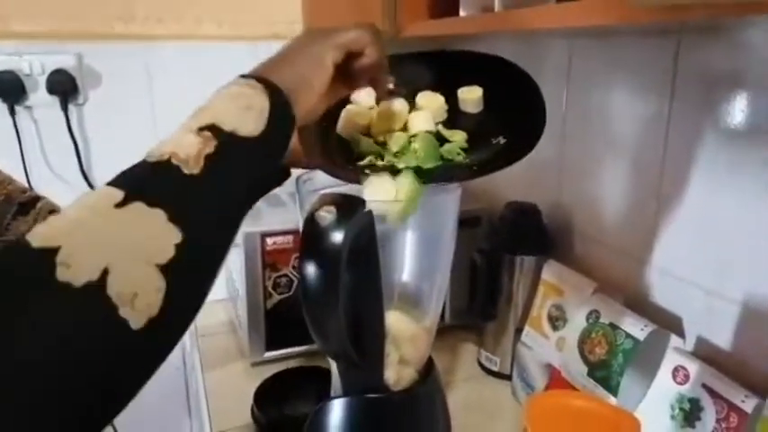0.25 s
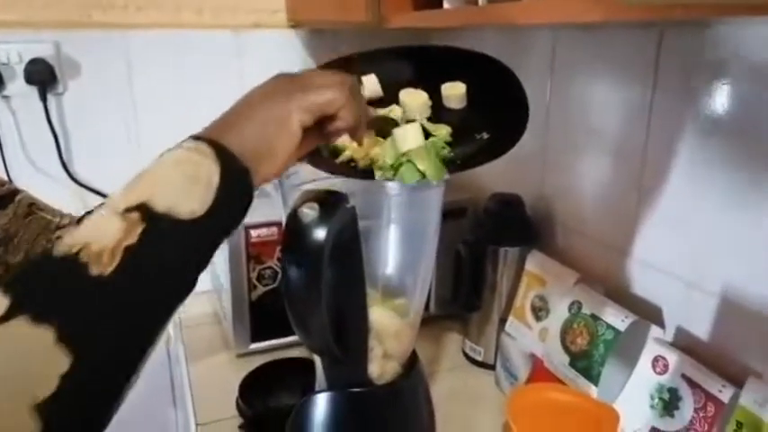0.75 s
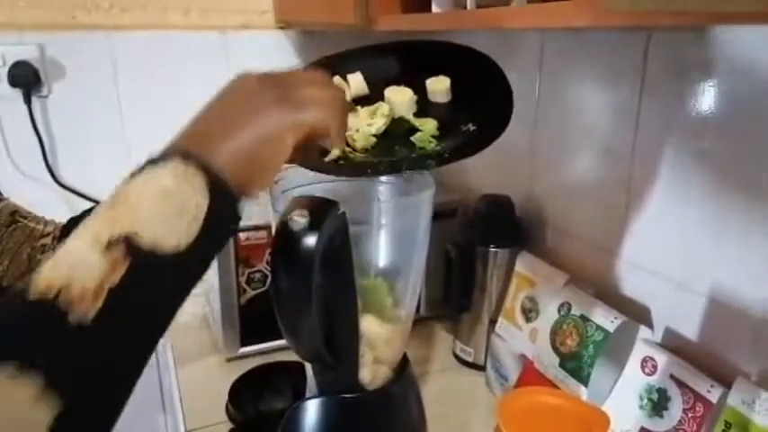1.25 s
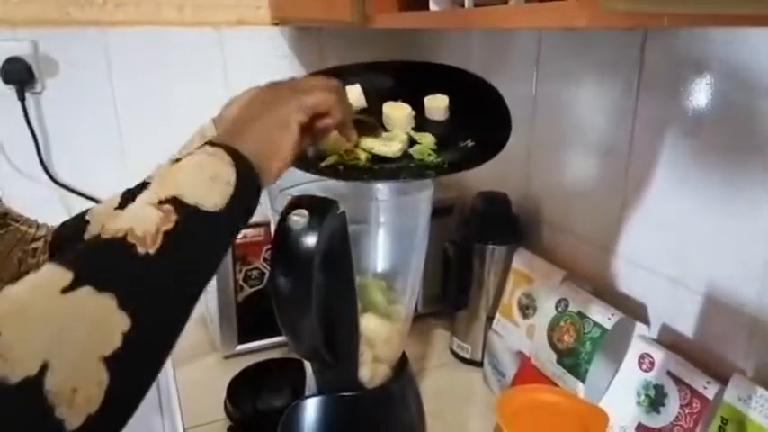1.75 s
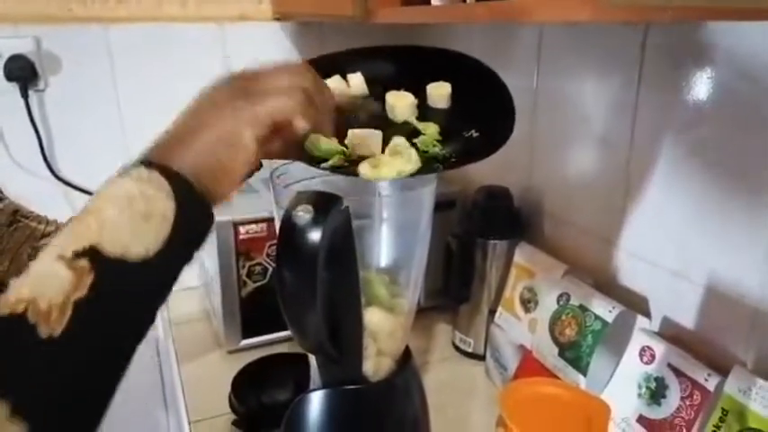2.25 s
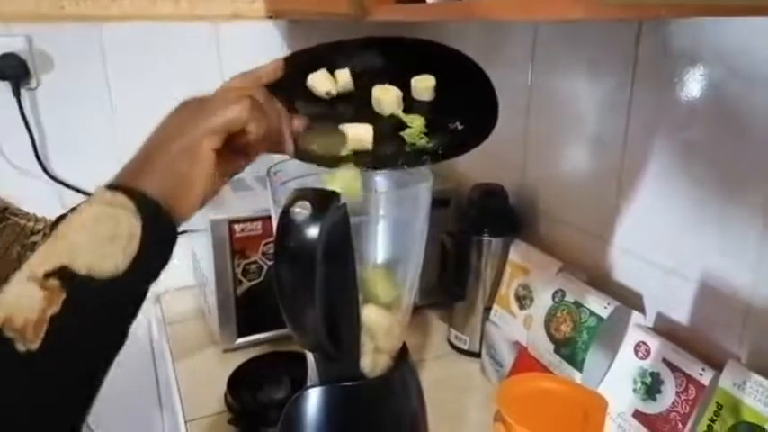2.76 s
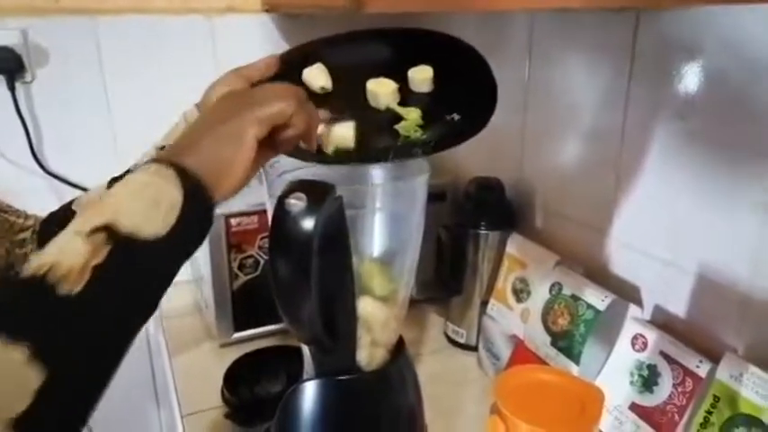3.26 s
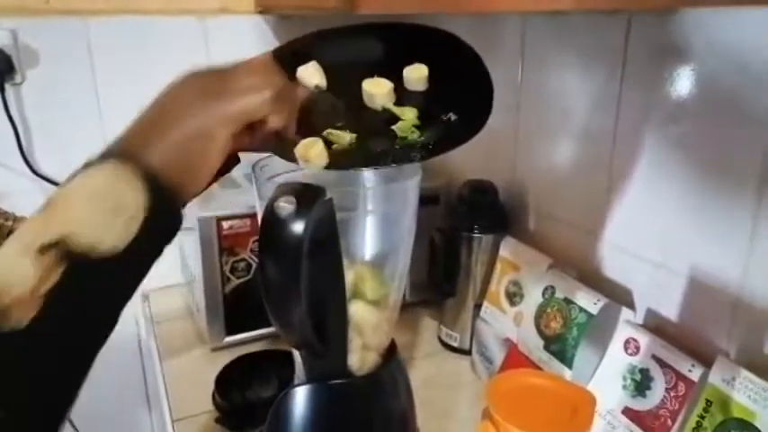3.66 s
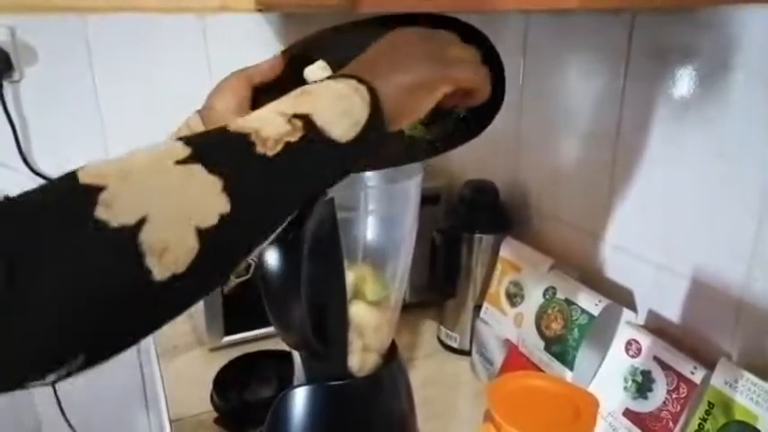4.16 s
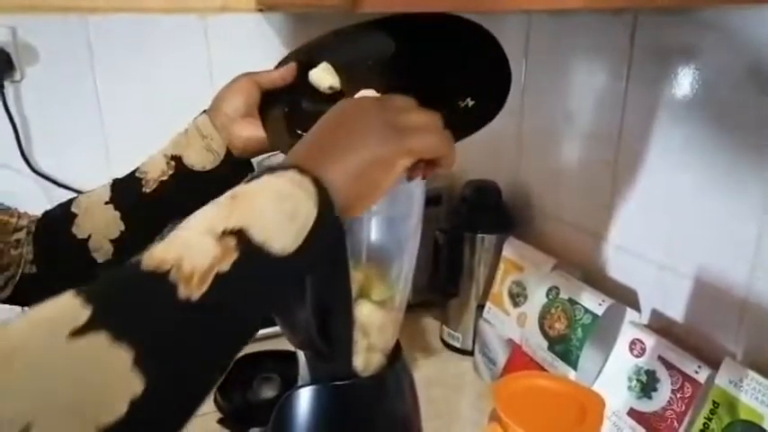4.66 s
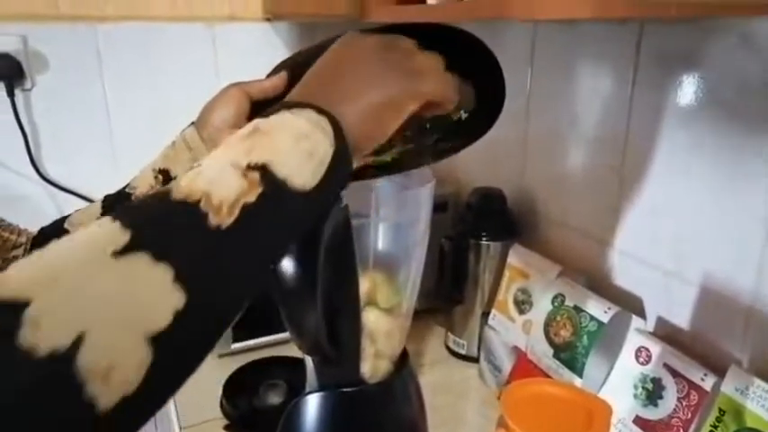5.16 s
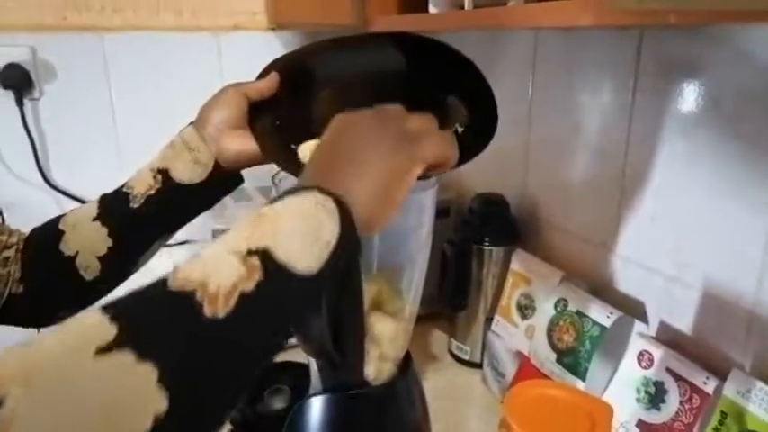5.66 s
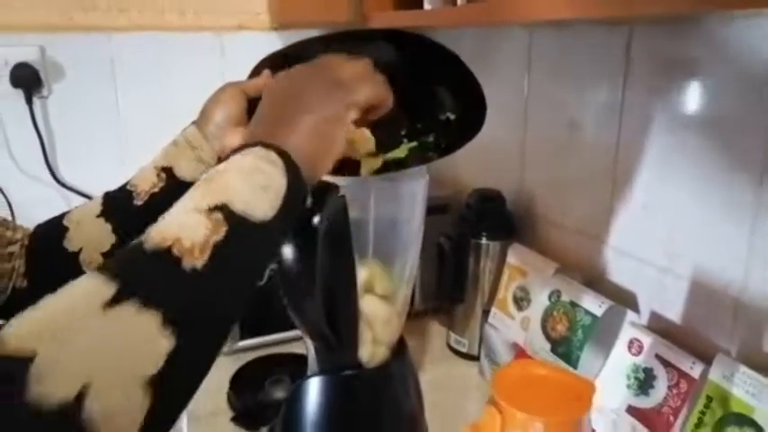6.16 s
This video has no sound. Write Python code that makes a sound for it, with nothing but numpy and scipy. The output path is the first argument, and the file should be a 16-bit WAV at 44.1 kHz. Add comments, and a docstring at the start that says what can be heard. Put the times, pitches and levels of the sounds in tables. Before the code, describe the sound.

Close stereo sound of fruit being spooned off a hard plate: piercing, short-ringing metal clinks tower over hollow plastic knocks, moist slipping rubs and small low thuds of landing pieces. The blows start sparse, a scrape grates midway, then jar knocks and rubbing grow denser until a last bright clink. Short hard-tiled reverberation and faint low rumble surround it.

```python
"""A steel spoon pushes chopped fruit off a hard plate into a plastic blender jar, in a small tiled kitchen.
From the start, shaped noise gives a faint room tone, and rubbing strokes add slipping, crackling noise.
After a faint handling tick, noise clacks and hollow modes make blows on the jar; wet ticks and low thuds join.
After a second the first of nine clinks sounds: a noise crack, short overtones and the plate's singing modes.
Near 3.4 s the spoon grates on the bare plate and against the jar; then rubs, blows and clinks go on."""
import sys
import numpy as np
from scipy import signal
from scipy.fft import rfft, irfft, next_fast_len
from scipy.io import wavfile
from scipy.ndimage import uniform_filter1d, map_coordinates

SR = 44100
rng = np.random.default_rng(int(sys.argv[2]) if len(sys.argv) > 2 else 0)


def inscribe(sig):
    """Save sig as 16-bit PCM at rate SR to the path in sys.argv[1].

    A 1-D sig is mono; a 2-D sig holds one channel per row.
    Samples are clipped to [-1, 1] before scaling.
    """
    pcm = np.round(np.clip(np.atleast_2d(sig).T, -1, 1) * 32767)
    wavfile.write(sys.argv[1], SR, pcm.astype(np.int16))


N = 282222

# Density of the room's hiss: (frequency [Hz], relative level [dB])
AIR_COLOUR = [(12, -29.5), (20, -3), (161, -9), (289, -13), (324, -14.5), (427, -17.5), (597, -18.5),
              (811, -25.5), (958, -20.5), (1500, -26.5), (1770, -24.5), (4310, -32.5), (5090, -30.5),
              (5530, -31), (15500, -38)]
# Density of the room's low rumble: (frequency [Hz], relative level [dB])
RUMBLE_COLOUR = [(20, 21.0), (50, 4.5), (80, -20.5), (140, -4.5), (250, -1), (900, -64)]
# Likeness of the two sides: (frequency [Hz], correlation [0-1])
SIDE_LIKENESS = [(30, 0.19), (70, 0.75), (200, 0.92), (500, 0.7), (1000, 0.32), (2500, 0.14), (12000, 0)]
# Reverberation of the tiled kitchen: (frequency [Hz], t60 [s])
KITCHEN_DECAY = [(100, 0.35), (300, 0.53), (800, 0.3), (2100, 0.36), (5600, 0.33), (9000, 0.29),
                 (15000, 0.13)]

# Spoon strokes through fruit, and a sleeve or handling rub near 4.4 s:
# (time [s], length [s], rub on the jar [dB], wet hiss [dB])
RUBBING_STROKES = [(0, .13, -55.5, -58.5), (0.717, .15, -41, -56.5), (0.89, .15, -52, -64),
                   (1.76, .1, -26, -37), (1.963, .51, -61.5, -58), (3.409, .15, -37.5, -39.5),
                   (4.418, 0.12, -42, -53), (4.706, 0.053, -32, -50), (4.966, .29, -33, -47.5),
                   (5.11, .21, -32.5, -44.5), (5.526, .13, -46.5, -43), (5.766, .26, -54.5, -51)]
# Density of the low rub: (frequency [Hz], relative level [dB])
RUB_COLOUR = [(50, -27), (110, 1), (250, 4.5), (420, 2.5), (700, -9.5), (1050, -7), (1300, -22),
              (1700, -21), (3100, -20), (4500, -53)]
# Density of the wet pulp: (frequency [Hz], relative level [dB])
PULP_COLOUR = [(800, -26.5), (2300, 24.5), (3700, -1), (5500, 4), (7300, 6.5), (9000, -39.5),
               (15000, -12.5)]
# Strengths of the grating overtones: (frequency [Hz], relative level [dB])
GRATE_COLOUR = [(4500, 1), (7500, -2.5), (9000, -10.5), (15000, -12.5)]

# Blows on the jar, after a faint handling tick at the start, and near 3.4-3.5 s the spoon grating against it:
# (time [s], level [dB], hardness [dB/octave], rocking of the jar on its base [dB])
JAR_CONTACTS = [(.075, -48.5, -3.5, 6), (0.4429, -24.5, 1.5, -5), (.65, -30, 0.5, -19), (.76, -44, -6, -1),
                (.979, -42, 0.1, -5), (1.555, -16, 1.66, -13), (1.734, -17, 3.5, -12),
                (1.919, -30.5, -4, 1.5), (2.264, -40.5, -3, -2.5), (3.391, -24.5, 2, -8),
                (3.451, -27.5, 2, -3), (3.542, -37, 4.5, 3), (4.6567, -16.5, -3.5, 4.5),
                (4.817, -28, 0, -12), (4.919, -16.5, 0.26, 3), (5.236, -22.5, -2, 3.5),
                (5.661, -17.5, 1.5, -7), (6.031, -32.5, -.2, 8.5), (6.188, -16, -1, 5),
                (6.216, -16, 0.2, 7)]
# Density of the plastic clack: (frequency [Hz], relative level [dB])
CLACK_COLOUR = [(50, -46), (110, 7), (300, 9), (700, 4), (1100, 6), (1300, -8.5), (1650, 1), (3100, -5.5),
                (3700, -11), (5500, -9), (7500, -11.5), (9000, -27.5), (15000, -55)]
# Modes of the jar on its base, undamped: (frequency [Hz], relative level [dB], t60 [s])
JAR_MODES = [(101.7, -3, .34), (145.5, -2, 0.27), (179, -0.5, 0.26), (238.1, 0, .27), (318, -5, .16),
             (408.1, -7, 0.27), (551.5, -6.5, .14), (681, 0, 0.13), (879, -8, 0.34), (1046, -8, .13),
             (1550, -13.5, 0.28), (2180, -5.5, 0.13), (3000, -8.5, 0.2)]

# Wet pieces coming unstuck: (time [s], relative level [dB])
WET_TICKS = [(0.586, -26.5), (1.019, -37), (1.468, -37.5), (2.91, -33), (3.956, -32), (4.701, -24),
             (5.279, -27), (5.925, -36)]
# Density of a tick: (frequency [Hz], relative level [dB])
TICK_COLOUR = [(1500, -15), (4000, -18), (7000, 5), (10000, -11.5), (15000, -12.5)]
# Soft low thuds: landings of fruit, the low body of some blows, a rumble near 2 s: (time [s], relative level [dB])
LOW_THUDS = [(.632, -33), (.819, -36), (2.03, -39), (3.544, -31.5), (3.727, -44.5), (3.968, -31.5),
             (4.028, -42), (5.863, -37), (5.988, -33.5)]
# Density of a thud: (frequency [Hz], relative level [dB])
THUD_COLOUR = [(40, -11), (100, -1), (165, 9), (260, -19), (600, -29), (2000, -40.5)]

# Spoon on plate: (time [s], level [dB], brightness [dB/octave], freedom of the plate to ring [0-1],
# three pitches that this striking point favours [Hz, Hz, Hz], left over right [dB])
SPOON_CLINKS = [(1.0914, -2, 1.1, 0.083, 2220, 5320, 5610, 3.5),
                (1.665, -6, -1, 0.43, 2370, 3897, 5500, -1.5),
                (2.570, -1.5, 2, 0.41, 5835, 7040, 7187, -3.5),
                (2.7052, -18, 1, 0.49, 2220, 7400, 7230, -3.5),
                (3.1729, 0.5, -1.5, .9, 2220, 5446, 5533, -4),
                (3.3826, -12, 3.5, .5, 2700, 6228, 6980, -8.5),
                (4.203, 2.5, -0.04, 0.97, 3143, 6228, 7060, 2),
                (5.4041, -3.5, -0.6, 0.48, 3143, 5835, 6560, -4), (6.3319, -1, 1, .9, 5530, 5835, 7712, -8)]
# Modes of plate and spoon, t60 before contact alters it: (frequency [Hz], relative level [dB], nominal t60 [s])
PLATE_MODES = [(2227, -4.5, 0.11), (2342, -8.5, .08), (2684, -9, 0.03), (2987, -6, 0.13), (3110, -4.5, 0.1),
               (3870, -9.5, 0.037), (4380, -13, .06), (4705, -4, 0.16), (4910, -15, .05), (5130, -2.5, .09),
               (5374, 2, .06), (5525, -5.5, .07), (5640, -1.5, 0.081), (5790, -10.5, .09),
               (6180, -12, 0.087), (6545, -3, 0.092), (6970, -4, 0.057), (7020, -3.5, 0.077),
               (7135, -4, 0.14), (7530, -5.5, 0.065), (7500, -8, .08), (8340, -6.5, 0.15),
               (8430, -12.5, 0.079)]
# Density of the crack and strengths of the short overtones: (frequency [Hz], relative level [dB])
CRACK_COLOUR = [(100, -29.5), (450, -12), (900, 1), (1350, -6), (1600, -3), (2300, 5.5), (3700, 5),
                (5500, 7), (7400, 9), (9000, -3.5), (11000, -7.5), (15000, -11.5)]

LIFE = np.arange(int(.55 * SR)) / SR  # time axis of one blow [s]
AIR_DB = -47.5
BUMPS_PER_S, BUMP_DB = 45, -2  # small taps within a stroke; their level beside the smooth rub
GRATE_S, GRATE_LENGTH_S, GRATE_DB = 3.42, 0.13, -31  # the spoon's edge grates once on the bare plate
HARD_ABOVE_HZ = 700  # a harder contact lifts the spectrum progressively above this pitch
ROCK_HZ, ROCK_OCTAVES = 105, .55  # the jar rocking on its base: centre and width
JAR_LOWEST_HZ = 83.8  # the jar radiates little below this
FAVOUR_DB, FREE_FAVOUR_DB = 9, 8  # lift of the favoured modes, and its growth when the plate rings freely
OVERTONES_DB, CRACK_DB = 3.5, -2.5  # beside the singing modes
CLINK_PIVOT_HZ, CLINK_TOP_HZ = 4500, 7200  # brightness tilts the clink about the first pitch, up to the second
TOP_HZ = 15700  # band limit


def amp(db):
    """Level and amplitude: decibels to gain."""
    return 10 ** (np.asarray(db) / 20)


def unit(x):
    """Mean power: scale a signal to rms 1."""
    return x / np.sqrt(np.mean(x ** 2) + 1e-20)


def along(points, hz):
    """Logarithmic pitch scale: join (Hz, value) points on a log axis."""
    f, v = np.transpose(points)
    return np.interp(np.log(hz + 1), np.log(f + 1), v)


def filtered(x, response):
    """Linear filtering: multiply the spectrum of x by a response of frequency."""
    n = x.shape[-1]
    m = next_fast_len(n + 8192)
    spectrum = rfft(x, m) * response(np.fft.rfftfreq(m, 1 / SR))
    return irfft(spectrum, m)[..., :n]


def wobble(rate, size):
    """Slow random modulation: a smooth curve through `rate` random knots a second."""
    knots = rng.standard_normal(int(size * rate / SR) + 4)
    return map_coordinates(knots, [np.arange(size) * rate / SR])


def noise(colour, size):
    """Partial coherence: coloured stereo noise of rms 1, most alike in the bass, unrelated in the treble."""
    def mid_side(hz):
        turn = np.arccos(np.clip(along(SIDE_LIKENESS, hz), -1, 1)) / 2
        return amp(along(colour, hz)) * [np.cos(turn), np.sin(turn)]

    mid, side = filtered(rng.standard_normal((2, size)), mid_side)
    return unit(np.array([mid + side, mid - side]))


def fade(t60):
    """Exponential decay: the level falls 60 dB in t60 seconds."""
    return amp(-60 * LIFE / max(t60, 1e-3))


def add(track, s, sound):
    """Superposition: mix a sound into the track at time s."""
    start = max(round(s * SR), 0)
    track[:, start:start + sound.shape[1]] += sound[:, :max(N - start, 0)]


def kitchen(x, wet_db):
    """Reverberation: direct sound plus a fresh noise tail from the tiles, each frequency dying at its own speed."""
    hz, t, z = signal.stft(noise([(1, 0)], len(LIFE)), SR, nperseg=256)
    decay = amp(-60 * t / along(KITCHEN_DECAY, hz)[:, None])
    tail = signal.istft(z * decay, SR, nperseg=256)[1]
    tail = tail / np.linalg.norm(tail[0])
    return x + amp(wet_db) * signal.fftconvolve(x, tail, axes=1)[:, :x.shape[1]]


def ring(modes, scatter_db):
    """Modal superposition: damped modes of random strength, whose phases differ more between sides when higher."""
    hz, db, t60 = np.transpose(modes)
    t60 = np.maximum(t60, 1e-3)
    chance = rng.standard_normal((3, len(hz)))
    apart = np.arccos(np.clip(along(SIDE_LIKENESS, hz), -1, 1)) / 2 * np.sign(chance[1])
    phase = np.pi * chance[2] + np.array([apart, -apart])
    weights = amp(db + scatter_db * chance[0]) * np.exp(1j * phase)
    complex_rate = 2j * np.pi * hz - np.log(1000) / t60
    waves = np.exp(complex_rate[:, None] * LIFE[LIFE < t60.max()])
    sound = (weights @ waves).imag / np.linalg.norm(weights[0])
    return np.pad(sound, ((0, 0), (0, len(LIFE) - sound.shape[1])))


def overtones(colour, low_hz, high_hz, t60, count):
    """Modal density: a crowd of modes, strewn at random under a colour."""
    hz = low_hz + (high_hz - low_hz) * (np.arange(count) + rng.random(count)) / count
    return np.c_[hz, along(colour, hz), np.full(count, t60)]


def room_tone():
    """Stationary broadband noise: a faint hiss over a low rumble of wandering level."""
    hiss = amp(AIR_DB - 0.5) * noise(AIR_COLOUR, N)
    rumble = amp(-53.5 + 2.1 * wobble(4.5, N)) * noise(RUMBLE_COLOUR, N)
    return hiss + rumble


def swell(size):
    """Contact pressure: the force of one stroke rises and falls."""
    return np.abs(np.sin(np.linspace(0, np.pi, size))) ** .5


def chatter(modes, size):
    """Frictional excitation: uneven slips keep the modes ringing."""
    slips = rng.standard_normal(size) * amp(5.9 * wobble(130, size))
    return unit(signal.fftconvolve(slips[None], ring(modes, scatter_db=3), axes=1)[:, :size])


def bumps(size):
    """Damped impulse response: taps at random moments excite the jar, which the resting plate damps."""
    count = max(int(BUMPS_PER_S * size / SR), 2)
    taps = np.bincount(rng.integers(0, size, count), amp(rng.normal(0, 4, count)), size)
    damped = [(hz, db, t60 * 0.45) for hz, db, t60 in JAR_MODES]
    return unit(signal.fftconvolve(taps[None], ring(damped, scatter_db=1.5), axes=1)[:, :size])


def scrapes():
    """Sliding friction: small slips, random taps and crackling noise make the rubbing strokes and one grating."""
    track = np.zeros((2, N))
    held = [(hz, db, .02) for hz, db, _ in PLATE_MODES]  # the pressing spoon damps the plate
    for s, length, rub_db, wet_db in RUBBING_STROKES:
        size = int(length * SR)
        smooth_rub = noise(RUB_COLOUR, size) * amp(2.5 * wobble(90, size))
        rub = unit(smooth_rub + amp(BUMP_DB) * bumps(size))
        crackle_db = 3.6 * wobble(60, size) + 8.4 * wobble(630, size)
        pulp = unit(noise(PULP_COLOUR, size) * amp(crackle_db))
        wet = unit(pulp + 1.5 * chatter(held, size))
        add(track, s, swell(size) * (amp(rub_db) * rub + amp(wet_db) * wet))
    size = int(GRATE_LENGTH_S * SR)
    edge = overtones(GRATE_COLOUR, 4400, 15500, t60=0.037, count=70)
    add(track, GRATE_S, amp(GRATE_DB) * swell(size) * chatter(edge, size))
    return kitchen(track, wet_db=-2.5)


def blow_of(x, level_db, colour_db, rise_s):
    """Impact: force scales the first 40 ms, touch then colours the blow, and contact takes a moment to build."""
    head = x[:, :SR // 25]
    coloured = filtered(x / np.sqrt(np.mean(head ** 2)), lambda hz: amp(level_db + colour_db(hz + 1)))
    return coloured * (1 - np.exp(-LIFE / max(rise_s, 1e-4)))


def jar_contacts():
    """Impact on a hollow shell: a handling tick, then blows and grating contacts, as a clack and a boom each."""
    track = np.zeros((2, N))
    for s, level_db, hardness, rock_db in JAR_CONTACTS:
        clack = noise(CLACK_COLOUR, len(LIFE)) * fade(0.074)
        walls = ring(overtones(CLACK_COLOUR, 239.1, 8500, t60=0.1, count=56), scatter_db=1.0)
        boom = ring(JAR_MODES, scatter_db=2.5)
        blow = kitchen(clack + amp(1) * walls, wet_db=-5.5) + amp(0.5) * kitchen(boom, wet_db=-5)

        def touch_db(f):
            hard_db = hardness * np.log2(np.maximum(f / HARD_ABOVE_HZ, 1))
            return hard_db + rock_db * np.exp(-(np.log2(f / ROCK_HZ) / ROCK_OCTAVES) ** 2)

        add(track, s, blow_of(blow, level_db, touch_db, rise_s=0.0012))
    low_cut = signal.butter(3, JAR_LOWEST_HZ, "high", fs=SR, output="sos")
    return signal.sosfilt(low_cut, track) * amp([[1.3], [-1.3]])  # a little to the left


def ticks_and_thuds():
    """Adhesion and soft impact: short bright noise as wet pieces come unstuck, slow low noise for soft thuds."""
    track = np.zeros((2, N))
    for s, db in WET_TICKS:
        add(track, s, amp(db - 8.5) * noise(TICK_COLOUR, len(LIFE)) * fade(0.034))
    for s, db in LOW_THUDS:
        soft_onset = 1 - np.exp(-LIFE / 0.0044)
        add(track, s, amp(db + 4) * noise(THUD_COLOUR, len(LIFE)) * fade(0.25) * soft_onset)
    return kitchen(track, wet_db=-3)


def clinks():
    """Modal excitation: steel strikes the plate with a crack, short overtones and a few modes that sing on."""
    track = np.zeros((2, N))
    hz, db, t60 = np.transpose(PLATE_MODES)
    for s, level_db, brightness, free, *pitches_hz, pan_db in SPOON_CLINKS:
        nearest = np.abs(hz[:, None] - pitches_hz).argmin(0)
        favoured = np.isin(np.arange(len(hz)), nearest)
        # a spoon that bounces clear lets the plate sing; one that stays pressed on chokes it
        free = np.clip(free, 0, 1)
        lifted_db = db + (FAVOUR_DB + FREE_FAVOUR_DB * free) * favoured
        singing = ring(np.c_[hz, lifted_db, t60 * (.55 + .9 * free)], scatter_db=-1.5)
        short = ring(overtones(CRACK_COLOUR, 500, 15500, t60=0.052, count=60), scatter_db=5.5)
        crack = noise(CRACK_COLOUR, len(LIFE)) * fade(0.032)
        attack = amp(OVERTONES_DB) * short + amp(CRACK_DB) * crack
        blow = kitchen(singing, wet_db=-5) + kitchen(attack, wet_db=-8.0)

        def touch_db(f):
            return brightness * np.log2(np.clip(f, HARD_ABOVE_HZ, CLINK_TOP_HZ) / CLINK_PIVOT_HZ)

        pan = amp(np.array([[pan_db], [-pan_db]]) / 2)
        add(track, s, blow_of(blow, level_db, touch_db, rise_s=0.0017) * pan)
    return track


def scene():
    """Superposition: the sum of everything heard in the kitchen."""
    return room_tone() + scrapes() + jar_contacts() + ticks_and_thuds() + clinks()


def limiter(x, ceiling_db, release_db_per_s):
    """Gain control: the gain ducks under a loud burst and creeps back, taking the room's rumble with it."""
    power = np.abs(uniform_filter1d(np.mean(x ** 2, 0), size=128))
    over_db = np.maximum(10 * np.log10(power + 1e-12) - ceiling_db, 0)
    recovery = release_db_per_s * np.arange(N) / SR
    duck_db = np.maximum.accumulate(over_db + recovery) - recovery
    return x * amp(-uniform_filter1d(duck_db, size=64))


def record(dry):
    """Saturation and band limit: loud bursts are limited, peaks flatten toward full scale, high treble is cut."""
    held = limiter(dry, ceiling_db=-2.0, release_db_per_s=20.0)
    clipped = held / (1 + np.abs(held) ** 8) ** (1 / 8)
    return filtered(clipped, lambda hz: hz < TOP_HZ)


dry = scene()
out = record(dry)
inscribe(out)
```